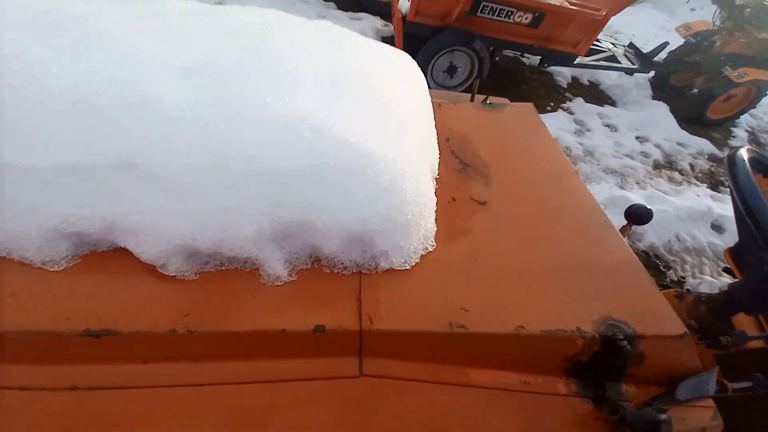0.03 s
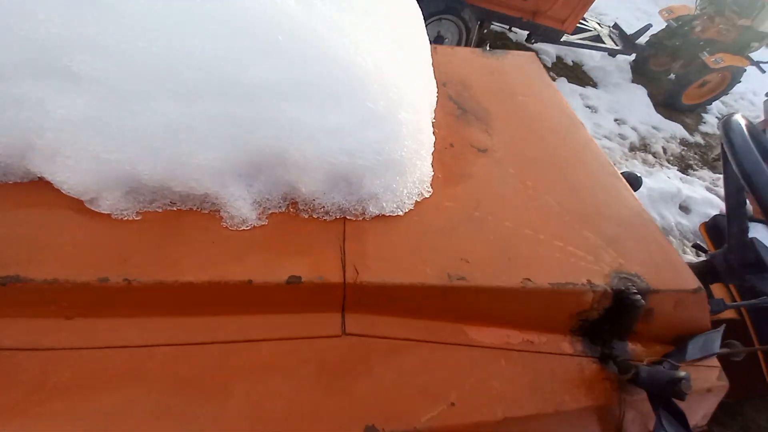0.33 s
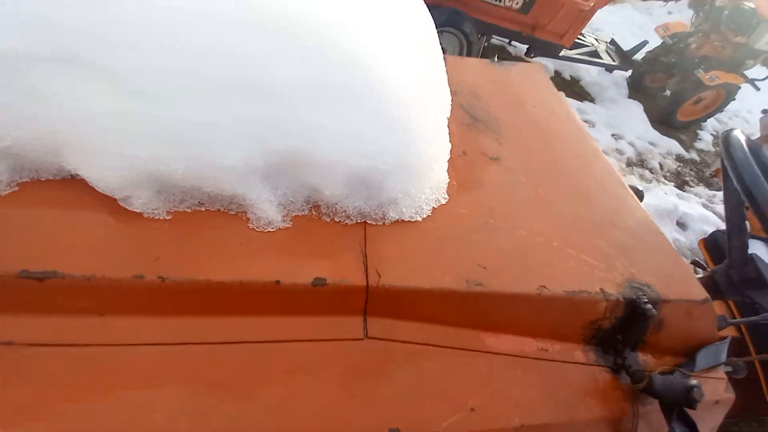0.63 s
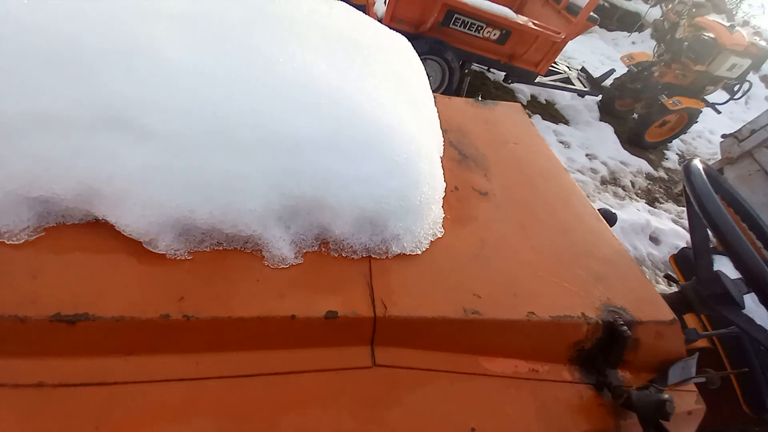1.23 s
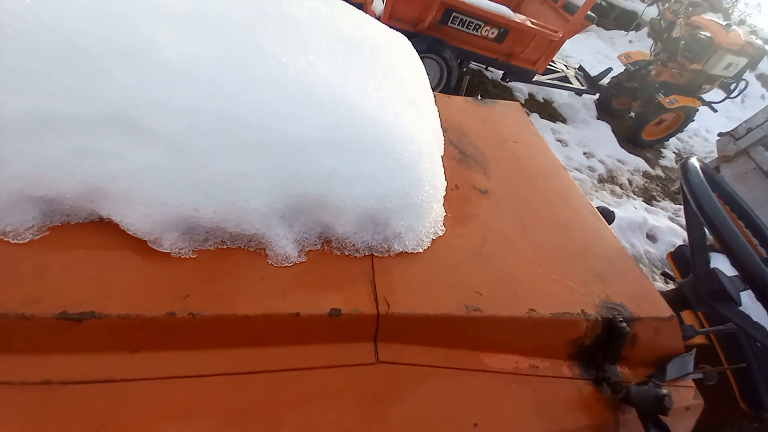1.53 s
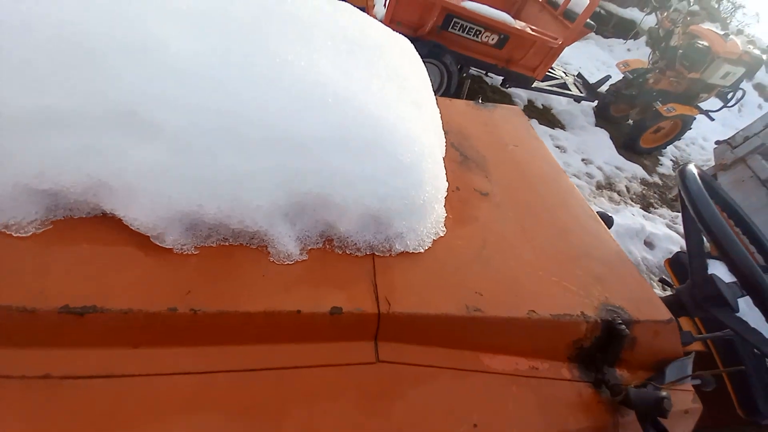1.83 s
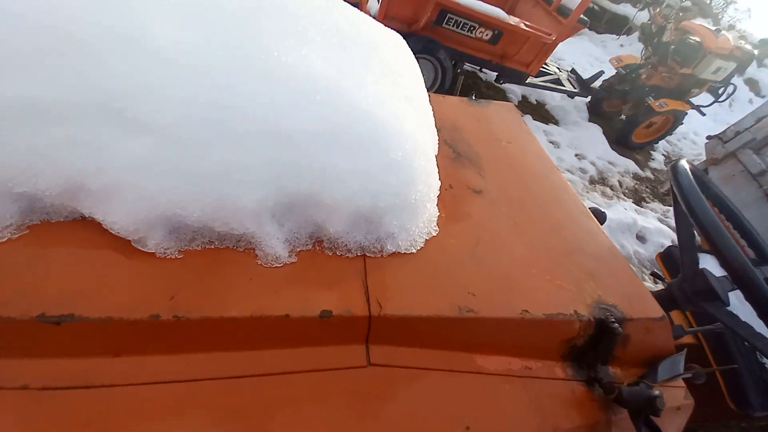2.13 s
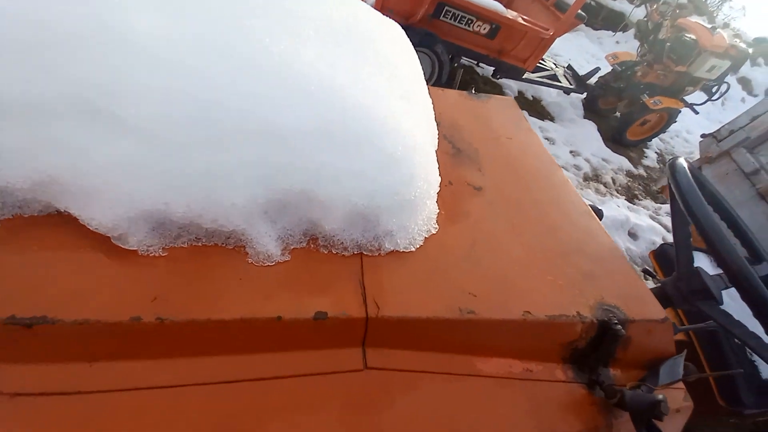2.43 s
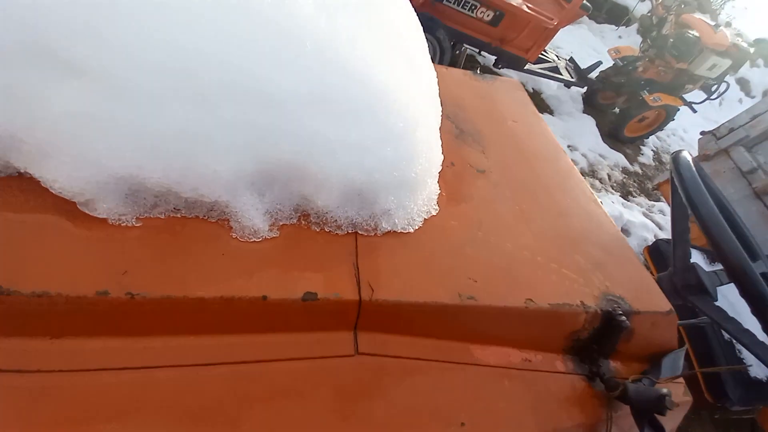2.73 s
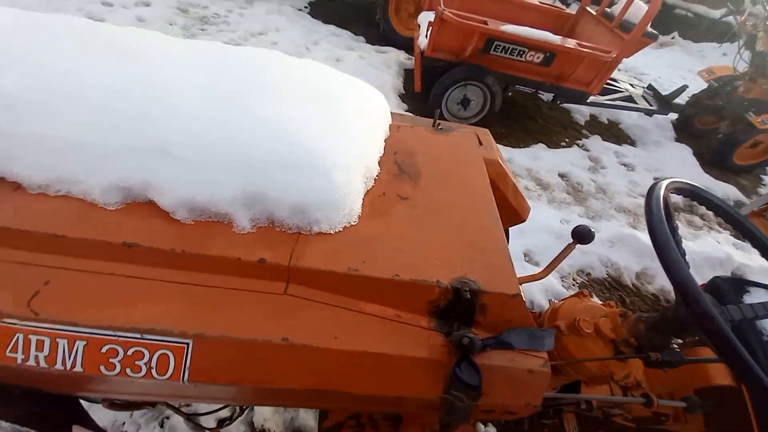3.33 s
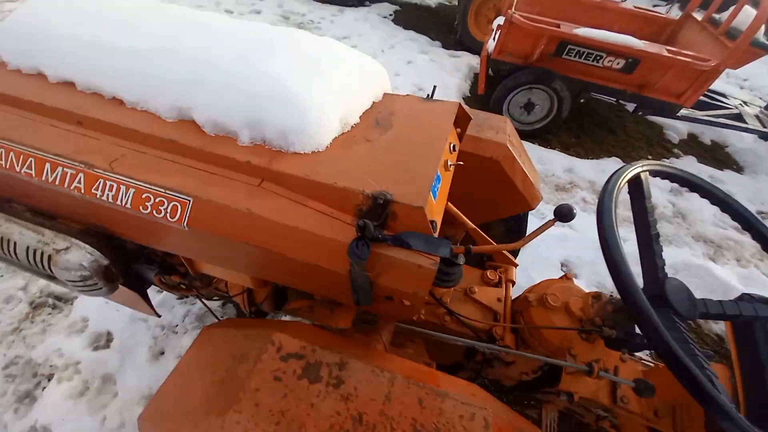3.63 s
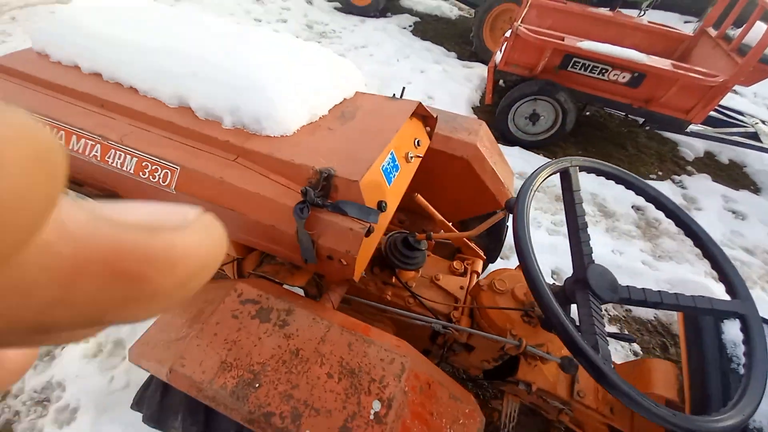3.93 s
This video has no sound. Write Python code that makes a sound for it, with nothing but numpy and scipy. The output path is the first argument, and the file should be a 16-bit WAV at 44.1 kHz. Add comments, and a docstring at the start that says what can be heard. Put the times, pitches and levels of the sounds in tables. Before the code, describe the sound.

Diesel tractor engine clattering as it runs down and stalls, followed by a metal lever clank.

```python
"""Small diesel tractor running down

Heard outdoors from just above the sheet-metal hood. Gulps of air boom in a pipe, valve gear and
injection pump clatter ever more slowly over churning gears, and the last compression stalls the engine.
A lever clanks twice against its stop, and a jacket sleeve swishes past close by."""
import sys
import numpy as np
from scipy import signal
from scipy.fft import rfft, irfft
from scipy.io import wavfile
from scipy.ndimage import uniform_filter1d

SR = 44100
rng = np.random.default_rng(int(sys.argv[2]) if len(sys.argv) > 2 else 0)


def wav_out(sig):
    """Save sig, one row per channel (or a flat mono array), as 16-bit PCM at SR to the path in sys.argv[1]."""
    wavfile.write(sys.argv[1], SR, np.round(np.clip(np.atleast_2d(sig).T, -1, 1) * 32767).astype(np.int16))


N = 176400
TIME = np.arange(N) / SR
HZ = np.fft.rfftfreq(N, 1 / SR)

# Gulps of air. Each row: start in seconds, deep boom level in dB, upper boom level in dB.
GULPS = [(0, -24, -23.5), (0.033, -20, -52.5), (0.073, -14.5, -15.5), (0.117, -16, -15.5),
         (0.161, -33, -34.5), (0.215, -17.5, -31), (0.26, -15, -10), (0.3, -13.5, -18.5),
         (0.345, -14.5, -36), (0.392, -26, -45.5), (0.435, -14, -42), (0.473, -12.5, -22.5),
         (0.525, -20, -18), (0.585, -37, -22), (0.629, -15, -60), (0.688, -14, -26.5), (0.747, -19, -21.5),
         (0.868, -16.5, -38), (0.945, -12, -35), (1.018, -27, -28), (1.126, -28.5, -29.5),
         (1.197, -20, -32), (1.309, -16, -30.5), (1.434, -36, -34), (1.727, -27.5, -32.5), (2.32, -28, -62),
         (2.367, -32, -64), (3.126, -71, -56.5)]
# Pipe resonances, deep then upper. Each row: pitch in Hz, seconds to the peak, swell exponent, gain in dB.
PIPE_MODES = [(65.5, .017, 2.1, -2.5), (211, .016, 1.5, -1)]
# Tone of the rushing air. Each row: frequency in Hz, relative level in dB.
RUSH_EQ = [(70, -18), (130, 3.5), (300, -8), (420, -3), (2000, -47.5)]
def chugs():
    """Each gulp of air rushes, swells and dies in the pipe; the deep wave steepens at its height."""
    rush_db, rush_peak_s, detune, steepening = -6, 0.0099, 0.034, [.22, 0]
    boom, flow, t = np.zeros(N, complex), np.zeros(N), TIME[:SR // 5]
    puff = (t / rush_peak_s * np.exp(1 - t / rush_peak_s)) ** 2
    for (start, *levels), draws in zip(GULPS, rng.uniform(-0.92, 1, (len(GULPS), len(PIPE_MODES)))):
        add_at(flow, start, amp(np.mean(levels) + rush_db) * puff)
        for (hz, peak_s, power, gain_db), db, draw, edge in zip(PIPE_MODES, levels, draws, steepening):
            swell = (t / peak_s * np.exp(1 - t / peak_s)) ** power
            wave = swell * np.exp(2j * np.pi * hz * (1 + detune * draw) * (t - peak_s))
            add_at(boom, start, -amp(db + gain_db) * (wave + edge * (wave ** 3 - wave ** 2)))
    boom = signal.sosfilt(signal.butter(2, 38, "high", fs=SR, output="sos"), boom)
    wide_boom = np.array([boom, boom * np.exp(-.27j)]).real  # the left side leads in phase
    rush = colour(grit(3.9) * flow, amp(read(RUSH_EQ, HZ)))
    return wide_boom * amp([[.7], [-.7]]) + spread(rush)


# Engine knocks. Each row: start and length in seconds, then body, clack and sizzle levels in dB.
KNOCK_HITS = [(0.024, 0.013, -30.5, -24.5, -34), (0.07, 0.014, -32, -27, -44),
              (0.115, 0.007, -65.5, -29, -38.5), (0.162, 0.012, -56.5, -36, -30.5),
              (0.208, 0.014, -28.5, -25, -33), (0.253, 0.012, -27, -24.5, -38),
              (0.296, 0.0052, -40, -21.5, -33.5), (0.339, 0.015, -35, -31, -32),
              (0.391, 0.008, -29.5, -27, -35), (0.433, 0.018, -29, -36, -45),
              (0.478, 0.0084, -31, -29.5, -36), (0.524, 0.022, -32.5, -31.5, -34),
              (0.584, 0.0048, -26.5, -22, -31.5), (0.634, 0.012, -28, -30.5, -44),
              (0.686, 0.0059, -31.5, -27, -40), (0.744, 0.019, -66, -31.5, -38),
              (0.811, 0.015, -31.5, -26, -36.5), (0.876, 0.016, -28.5, -38, -45.5),
              (0.938, 0.021, -37.5, -34.5, -47.5), (0.992, 0.0095, -51, -33, -54),
              (1.015, 0.022, -40, -35, -39.5), (1.07, 0.0062, -36.5, -35, -72),
              (1.108, 0.014, -34.5, -27, -40.5), (1.205, 0.016, -34, -40, -55.5),
              (1.274, 0.0076, -36.5, -36, -79), (1.303, 0.017, -41.5, -36, -61),
              (1.377, 0.015, -39.5, -39, -77), (1.425, 0.0084, -51, -39.5, -48),
              (1.44, 0.013, -40.5, -39.5, -48), (1.505, 0.014, -37, -35, -64),
              (1.619, 0.0084, -76, -51, -57), (1.67, 0.012, -43, -41.5, -78), (1.719, 0.021, -43, -40, -63),
              (1.783, 0.0084, -64, -48.5, -62), (1.848, 0.0049, -40.5, -37.5, -83),
              (1.918, 0.0085, -48, -46.5, -68), (1.939, 0.013, -37, -35, -53.5),
              (2.088, 0.026, -42, -50.5, -94), (2.231, 0.01, -42, -36, -71), (2.316, 0.01, -36, -35.5, -81)]
# Tone of the clatter. Each row: frequency in Hz, relative level in dB.
CLATTER_EQ = [(290, -17.5), (400, 4), (560, -6), (760, -6), (1000, -12.5), (1530, -13), (2140, -3.5),
              (2980, -11), (5700, -12), (7320, -29.5), (8640, -46), (16000, -46.5)]
def clatter():
    """Valve gear and injection pump knock under the hood and set it ringing."""
    knocks = bursts(KNOCK_HITS, CLATTER_EQ, gains_db=[1, 0.3, 1.5],
                    attack_s=0.002, releases_s=[.011, .006, .006], grain_db=3.1)
    return hood(knocks, ring_db=-30, tail_db=-8) + struck(KNOCK_HITS, HOOD_MODES, low_db=-2, high_db=-12)


def pings():
    """Each knock lands on a different part and rings six short modes of its own."""
    low_hz, high_hz, gain_db, t60_s = 900, 6500, -5, .07
    t, out = TIME[:SR // 5], np.zeros((2, N))
    for start, length, _, clack_db, _ in KNOCK_HITS:
        spot, *phases = rng.random(size=(3, 6, 1))
        hz = low_hz * (high_hz / low_hz) ** spot
        modes = amp(read(CLATTER_EQ, hz)) * np.sin(2 * np.pi * (hz * t + np.array(phases)))
        attack = np.minimum(2 * t / length, 1)
        decay = amp(clack_db + gain_db - 60 * np.maximum(t - length, 0) / t60_s)
        add_at(out, start, unit(modes.sum(1)) * attack * decay)
    return out


# Heavy pump strokes, one per engine cycle. Each row: start in seconds, level in dB.
PUMP_STROKES = [(0.027, -25.5), (0.209, -25), (0.389, -27), (.586, -25), (0.81, -26.5), (1.104, -27.5)]
# Hollow tone of the engine block. Each row: frequency in Hz, relative level in dB.
BARK_EQ = [(500, -14), (850, 0), (1300, -2), (1700, -14)]
def pump():
    """Each stroke of the injection pump makes the block bark."""
    rise_s, decay_s, cutoff_hz = 0.0058, 0.042, 2 * BANDS_HZ[1]
    force = np.zeros(N)
    for start, db in PUMP_STROKES:
        t = np.maximum(TIME - start, 0)
        force += amp(db) * np.minimum(t / rise_s, 1) * np.exp(-t / decay_s)
    return colour(grit(5.1) * force, amp(read(BARK_EQ, HZ)) / (1 + (HZ / cutoff_hz) ** 10))


# Fade of the gears and belts. Each row: time in seconds, level in dB.
CHURN_FADE = [(0, -28), (.7, -29.5), (1.15, -35.5), (1.4, -40), (1.62, -46.5), (1.9, -43.5), (2.2, -51),
              (2.38, -39.5), (2.56, -82)]
# Tone of their rumble. Each row: frequency in Hz, relative level in dB.
CHURN_EQ = [(25, -51.5), (45, -12.5), (137, -13), (215, 4), (400, -9.5), (1020, -19.5), (2210, -20.5),
            (5050, -31), (8770, -43.5), (16000, -64.5)]
DULLING = 0.5  # extra dB of treble lost per dB of fade
def churn():
    """Gears and belts rumble, fading and dulling as the engine slows."""
    level_db = curve(CHURN_FADE)
    rumble = colour(grit(2.2) * amp(level_db), amp(read(CHURN_EQ, HZ)))
    gears = hood(rumble, ring_db=-30.5, tail_db=-34)
    bass = signal.sosfilt(signal.butter(1, BANDS_HZ[0], fs=SR, output="sos"), gears)
    return bass + (gears - bass) * amp(DULLING * (level_db - level_db.max()))


# Tone of the shudder. Each row: frequency in Hz, relative level in dB.
SHUDDER_EQ, SHUDDER_DB = [(35, -24), (70, 3), (140, -22.5)], -4.5
def shudder():
    """The engine shakes on its mounts until just after the last heavy pump stroke."""
    envelope = amp(curve(CHURN_FADE) + SHUDDER_DB) * (TIME < PUMP_STROKES[-1][0] + .4)
    tone = amp(read(SHUDDER_EQ, HZ)) / (1 + (HZ / BANDS_HZ[0]) ** 2)
    return colour(rng.standard_normal((2, N)) * envelope, tone)


# Intake groans. Each row: start in seconds, length in seconds, pitch in Hz, peak level in dB.
INTAKE_GROANS = [(1.537, 0.15, 224, -42.5), (2.12, 0.1, 228, -37.5), (2.346, .09, 204.7, -38.5)]
# Note of the trapped air. Each row: time in seconds, pitch in Hz, level in dB.
SQUEEZE_GLIDE = [(1.7, 125, -70), (1.73, 130, -35), (1.82, 152, -42), (1.87, 188, -45), (1.93, 210, -41),
                 (1.97, 250, -39), (2.02, 320, -62)]
def intake():
    """The intake groans, and trapped air rises in pitch as the piston climbs."""
    groans = np.zeros(N)
    for start, length, hz, db in INTAKE_GROANS:
        swell = [(start, hz, db - 10), (start + length / 2, hz, db), (start + length, hz, db - 10)]
        groans += hollow_note(swell, waver=.06, flutter_db=3)
    return groans + hollow_note(SQUEEZE_GLIDE, waver=.012, flutter_db=1.5)


# Buzzes of a loose steel part. Each row: start in seconds, level in dB.
STEEL_BUZZES = [(0.393, -32.5), (0.588, -39), (0.665, -37.5), (0.83, -43.5), (1.51, -46.5), (1.785, -58)]
# Its closely spaced modes, in Hz.
STEEL_HZ = [2080, 2150, 2310]
def loose_steel():
    """Set singing by some of the knocks, a loose steel part buzzes briefly and dies."""
    rise_s, hold_s, decay_s = 0.0058, .05, .025
    envelope = np.zeros(N)
    for start, db in STEEL_BUZZES:
        t = TIME - start
        envelope += amp(db) * np.clip(t / rise_s, 0, 1) * np.exp(-np.maximum(t - hold_s, 0) / decay_s)
    wander = np.cumsum(rng.standard_normal((len(STEEL_HZ), 2, N)), axis=2) * .05
    buzz = sum(np.sin(2 * np.pi * hz * TIME + phase) for hz, phase in zip(STEEL_HZ, wander))
    return envelope * unit(buzz)


def rattle():
    """Loose linkages tick at random while the engine shakes."""
    level_db = curve(CHURN_FADE)
    envelope = amp(level_db - 12 + DULLING * (level_db - level_db.max()))
    return colour(grit(6.5) * envelope, band(CLATTER_EQ, 1))


# Lever hits. Each row: start and length in seconds, then body, clack and sizzle levels in dB.
LEVER_HITS = [(2.532, 0.012, -43, -35.5, -43), (2.563, 0.0027, -35.5, -31.5, -69),
              (2.669, 0.0063, -82, -49.5, -54), (2.821, 0.014, -44, -44, -86),
              (2.862, 0.01, -49.5, -59, -97)]
# Tone of the hits. Each row: frequency in Hz, relative level in dB.
LEVER_EQ = [(290, -11), (468, -9.5), (640, -20), (845, -21), (1880, -13), (6040, -16.5), (8400, -40.5),
            (16000, -47)]
# Ring of the bracket. Each row: pitch in Hz, level in dB, seconds to fall 60 dB.
BRACKET_MODES = [(215, -6, .18), (395, -8, .2), (474, 0, .38), (635, -2, .27), (2050, 1, .07),
                 (2110, -15, .28), (3200, -2, .06)]
def lever():
    """The lever strikes its stop and sets its bracket ringing."""
    hits = bursts(LEVER_HITS, LEVER_EQ, gains_db=[-2, 1, 1],
                  attack_s=0.0013, releases_s=[.011, .0075, .007], grain_db=1.9)
    return hood(hits, ring_db=-18, tail_db=-7) + struck(LEVER_HITS, BRACKET_MODES, low_db=1, high_db=0)


# Pass of the sleeve. Each row: time in seconds, then low rub, swish and treble levels in dB.
SLEEVE_PASS = [(3.0, -91, -74.5, -62.5), (3.2, -83, -59.5, -71), (3.39, -73, -56, -65),
               (3.46, -60, -50, -56.5), (3.58, -42.5, -50, -61.5), (3.7, -64.5, -56.5, -66.5),
               (4, -115, -82.5, -94.5)]
# Cloth snag. Each row: start and length in seconds, then body, clack and sizzle levels in dB.
SLEEVE_SNAGS = [(3.546, .004, -51, -37.5, -76)]
# Tone of the cloth. Each row: frequency in Hz, relative level in dB.
SLEEVE_EQ = [(290, -6.5), (710, -5.5), (2160, 0.5), (3710, -5.5), (6250, -8.5), (8120, -31.5), (16000, -39)]
def sleeve():
    """Smooth cloth slides, rubs harder and snags."""
    slide = sum(colour(grit(1.2) * amp(curve(SLEEVE_PASS, column=k + 1) + db), band(SLEEVE_EQ, k))
                for k, db in enumerate([0, 1.5, 1.5]))
    fade_in = np.clip((TIME - 2.93) / 0.18, 0, 1)
    snag = bursts(SLEEVE_SNAGS, SLEEVE_EQ, gains_db=[0, 0, 0],
                  attack_s=0.0031, releases_s=[.02, .01, .01], grain_db=1.9)
    return slide * fade_in + snag


# Ring of the sheet metal. Each row: pitch in Hz, level in dB, seconds to fall 60 dB.
HOOD_MODES = [(408, -3, .25), (471, -3, .3), (631, -3, .3), (916, -8, .2), (1048, -6, .22), (1377, -9, .18),
              (1959, -4, .2), (2110, -3, .24), (2315, -3, .2), (2784, -8, .18), (3714, -9, .18)]
# Reverb of the engine bay and yard. Each row: frequency in Hz, seconds to fall 60 dB.
REVERB_TIMES = [(200, 0.5), (600, 0.54), (1200, 0.23), (2500, 0.19), (6000, 0.12)]
def hood(x, ring_db, tail_db):
    """Adds the ring of the sheet metal and a dense tail of reflections."""
    t = TIME[:SR // 2]
    ring = sum(amp(db - 60 * t / t60) * np.sin(2 * np.pi * hz * t) / np.sqrt(t60)
               for hz, db, t60 in HOOD_MODES)
    hz, frame_s, noise = signal.stft(rng.standard_normal((2, len(t))), SR, nperseg=256)
    decay = amp(-60 * frame_s / read(REVERB_TIMES, hz)[:, None])
    tail = signal.istft(noise * decay, SR, nperseg=256)[1][:, :len(t)] * np.minimum(t / 0.012, 1)
    response = amp(ring_db) * unit(ring) + amp(tail_db) * unit(tail)
    return x + convolve(x, response / np.sqrt(len(t)))


# Tone of the outdoor bed. Each row: frequency in Hz, relative level in dB.
YARD_EQ = [(30, -16.5), (90, 2.5), (1000, -16), (6000, -8.5), (9000, -28.5)]
def yard_air():
    """Faint hiss of the open yard."""
    return amp(-66) * colour(rng.standard_normal((2, N)), amp(read(YARD_EQ, HZ)))


# Stereo balance. Each row: frequency in Hz, left minus right in dB.
BALANCE = [(60, 3.5), (240, -1), (500, 0.5), (950, -0.5), (1900, -9), (3800, -6), (7500, -2), (15000, -5.5)]
# Stereo likeness. Each row: frequency in Hz, left-right correlation.
LIKENESS = [(250, 0.93), (500, 0.83), (1000, 0)]
def spread(x):
    """Stereo image: bass alike on both sides, treble wide and leaning right."""
    a, b = rfft(x)
    angle = np.arccos(np.clip(read(LIKENESS, HZ), -1, 1)) / 2
    mid, side = a * np.cos(angle), b * np.sin(angle)
    lean = amp(read(BALANCE, HZ) / 2)
    return irfft([(mid + side) * lean, (mid - side) / lean], N)


def bursts(hits, eq, gains_db, attack_s, releases_s, grain_db):
    """Each hit is a burst of tiny impacts in three bands, with attack, hold and release."""
    t, out = TIME[:SR // 4], np.zeros((2, N))
    attack = np.minimum(t / attack_s, 1)
    for k, (gain_db, release_s) in enumerate(zip(gains_db, releases_s)):
        power = np.zeros(N)
        for start, length, *levels in hits:
            release = np.exp(-np.maximum(t - length, 0) / release_s)
            add_at(power, start, (amp(levels[k] + gain_db) * attack * release) ** 2)
        out += colour(grit(grain_db) * np.sqrt(power), band(eq, k))
    return out


def struck(hits, modes, low_db, high_db):
    """Each hit rings the modes: the low ones by its body, the high ones by its clack."""
    t, out = TIME[:SR // 2], np.zeros((2, N))
    rings = np.array([amp(db - 60 * t / t60) * np.exp(2j * np.pi * hz * t) for hz, db, t60 in modes])
    is_low = np.array(modes)[:, 0] < BANDS_HZ[1]
    for (start, length, body, clack, _), phases in zip(hits, rng.random((len(hits), len(modes)))):
        push = amp(np.where(is_low, body + low_db, clack + high_db)) * np.exp(2j * np.pi * phases)
        wave = (push @ rings) * np.minimum(t / length, 1)
        add_at(out, start, np.array([wave.real, wave.imag]))
    return out


def hollow_note(glide, waver, flutter_db):
    """A wavering air resonance that follows a pitch and level curve."""
    drift, flutter = (unit(uniform_filter1d(uniform_filter1d(noise, size=500), size=500))
                      for noise in rng.standard_normal((2, N)))
    cycles = np.cumsum(curve(glide) * (1 + waver * drift)) / SR
    gate = (TIME > glide[0][0]) & (TIME < glide[-1][0])
    return gate * amp(curve(glide, column=2) + flutter_db * flutter) * np.sin(2 * np.pi * cycles)


def grit(grain_db):
    """Stereo noise of tiny uneven impacts; more grain_db makes it coarser."""
    sizes = np.minimum(rng.exponential(1, N // 18 + 1), 4)
    return unit(amp(grain_db * np.repeat(sizes, 18)[:N]) * rng.standard_normal((2, N)))


# Edges of the body, clack and sizzle bands, in Hz.
BANDS_HZ = [290, 1400, 8200, 16500]
def band(eq, index):
    """Gain curve for one band of an EQ: 0 body, 1 clack, 2 sizzle."""
    low, high = BANDS_HZ[index:index + 2]
    return amp(read(eq, HZ)) / np.sqrt((1 + (low / (HZ + 1)) ** 12) * (1 + (HZ / high) ** 20))


def colour(x, gain):
    """Minimum-phase EQ with the given shape, scaled to unit energy."""
    log_gain = np.log(np.maximum(unit(gain), 1e-4))
    mirrored = np.r_[log_gain, log_gain[-2:0:-1]]
    response = np.fft.ifft(np.exp(np.conj(signal.hilbert(mirrored)))).real
    return convolve(x, response[:4096])


def convolve(x, response):
    """Filters each channel."""
    return signal.fftconvolve(np.atleast_2d(x), np.atleast_2d(response), axes=1)[:, :N]


def add_at(track, start_s, sound):
    """Mixes a sound into a track."""
    track[..., int(start_s * SR):][..., :sound.shape[-1]] += sound


def curve(rows, column=1):
    """One column of a time table at every sample."""
    rows = np.array(rows)
    return np.interp(TIME, rows[:, 0], rows[:, column])


def read(rows, hz):
    """Reads a table on a log-frequency axis."""
    row_hz, values = np.transpose(rows)
    return np.interp(np.log(hz + 1), np.log(row_hz), values)


def amp(db):
    """Decibels to gain."""
    return 10 ** (np.asarray(db) / 20)


def unit(x):
    """Scales to rms 1."""
    return x / np.sqrt(np.mean(x ** 2) + 1e-20)


def scene():
    """Engine, lever and sleeve in the yard."""
    machinery = clatter() + rattle() + pings() + loose_steel() + pump() + churn() + shudder()
    return spread(machinery + lever() + sleeve() + yard_air()) + chugs() + intake()


def record(dry):
    """A steep low-pass trims the very top of the treble."""
    lowpass = signal.firwin(511, cutoff=16300, window=("kaiser", 9), fs=SR)
    return signal.oaconvolve(dry, lowpass[None], "same")


dry = scene()
out = record(dry)
wav_out(out)
```